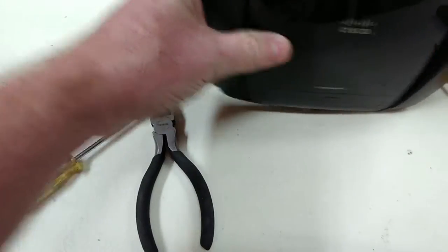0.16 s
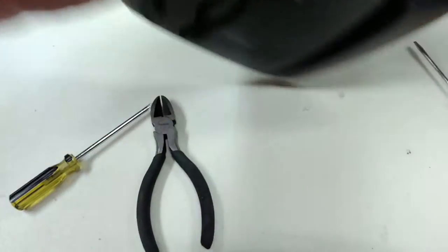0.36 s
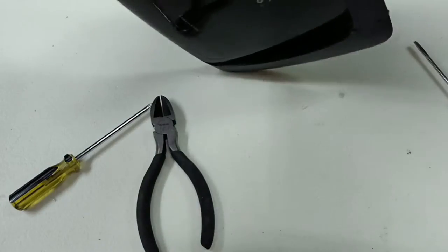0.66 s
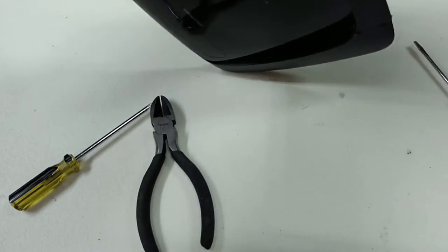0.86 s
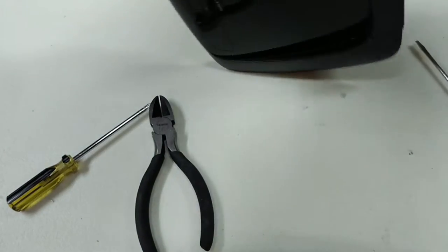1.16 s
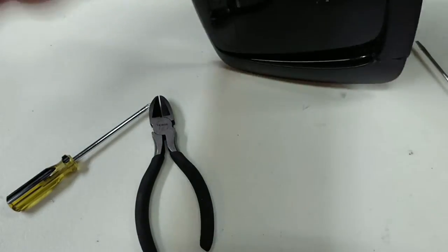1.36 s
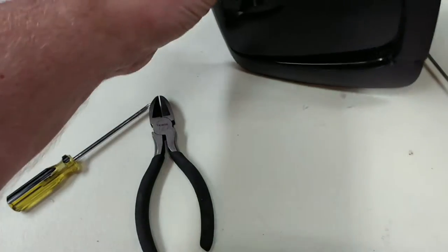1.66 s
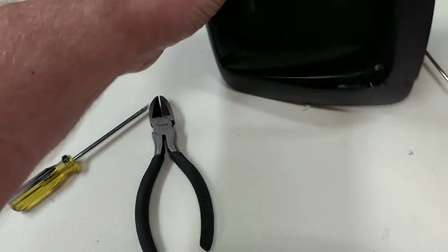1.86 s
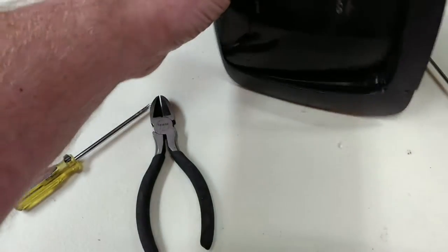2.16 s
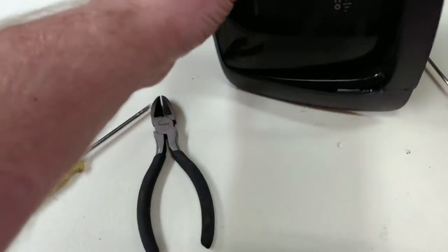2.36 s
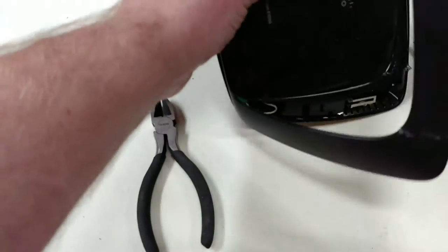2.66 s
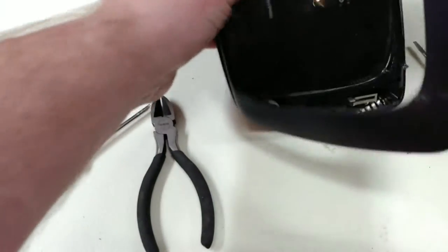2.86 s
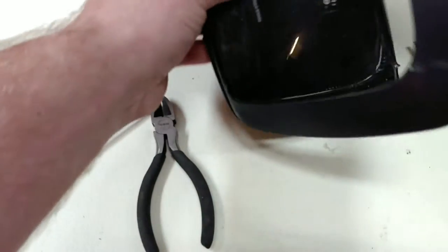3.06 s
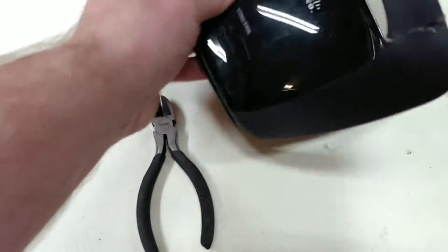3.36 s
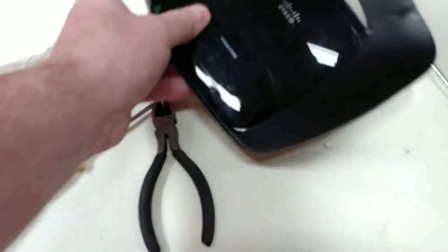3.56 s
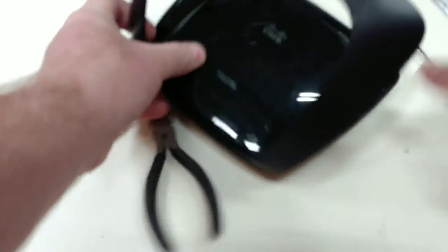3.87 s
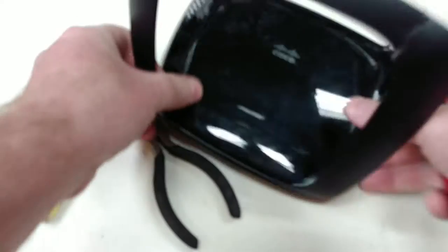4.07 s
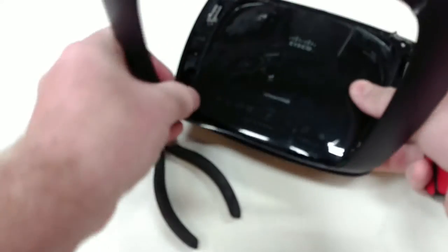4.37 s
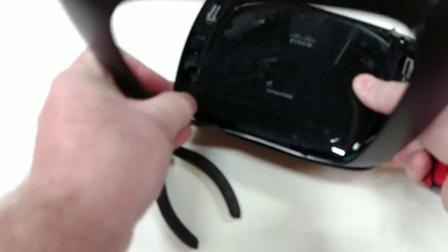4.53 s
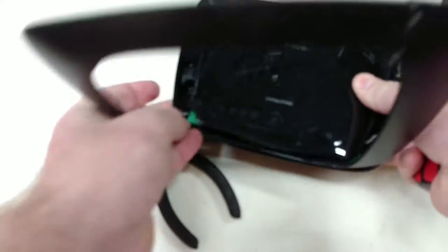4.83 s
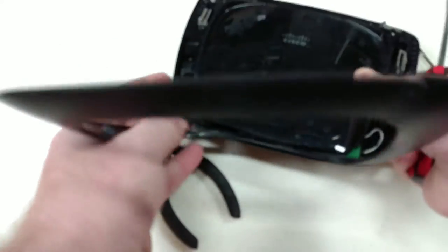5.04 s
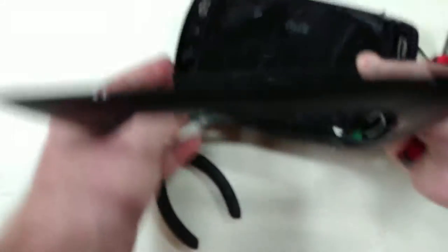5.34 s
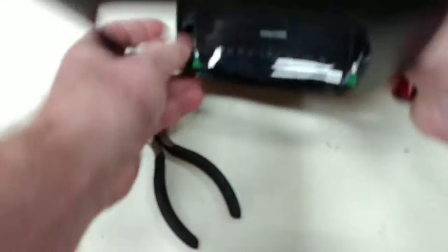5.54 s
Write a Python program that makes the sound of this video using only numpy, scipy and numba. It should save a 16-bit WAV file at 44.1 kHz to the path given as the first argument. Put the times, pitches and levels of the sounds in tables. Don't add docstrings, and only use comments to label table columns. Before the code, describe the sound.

Hands work a stiff plastic shell until its clips break with bright, dry, very short cracks that ring the hollow and echo briefly in a bare indoor room. Between them come tiny ticks, skin and plastic rubbing, dull bench thuds and, later, light fluttering taps. The microphones are very close, with breaks leaning left; the loudest snaps overload slightly and the level dips right after.

```python
import sys
import numpy as np
from scipy import signal
from scipy.fft import rfft, irfft
from scipy.io import wavfile
from scipy.ndimage import uniform_filter1d
from numba import njit

SR = 44100
rng = np.random.default_rng(int(sys.argv[2]) if len(sys.argv) > 2 else 0)


def field_ratio(decibels):
    return 10 ** (np.asarray(decibels, dtype=float) / 20)


def transcribe(u):
    v = np.clip(np.atleast_2d(u).T, -1, 1)
    q = np.round(v * 32767).astype(np.int16)
    wavfile.write(sys.argv[1], SR, q)


N = 251370
T = np.arange(N) / SR

# time in seconds, pitch in Hz.
HOLLOW_NOTE = [(0, 1221), (.75, 1333), (1.25, 1376), (1.66, 1180), (1.78, 1236), (2.8, 1255), (3.4, 1355),
               (3.62, 1173), (3.75, 1076), (4.3, 1148), (4.6, 1107), (4.8, 1170), (5.2, 1073), (5.7, 1032)]


def shape(x, points):
    hz, db = np.transpose(points)
    f = np.maximum(np.arange(x.shape[-1] // 2 + 1) * SR / x.shape[-1], 1)
    gain = field_ratio(np.interp(np.log(f), np.log(hz), db))
    return irfft(rfft(x) * gain, x.shape[-1])


def band(x, lo_hz, hi_hz):
    sos = signal.butter(2, [lo_hz, hi_hz], "band", fs=SR, output="sos")
    y = signal.sosfilt(sos, x)
    return y / np.sqrt(np.mean(y ** 2))


def ring(t, modes, chance, detune):
    total = 0
    for (hz, t60, db), c in zip(modes, chance):
        note = np.sin(2 * np.pi * hz * (1 + detune * c) * t)
        total = total + field_ratio(db + 1.6 * c) * note * 1000 ** (-t / t60)
    return total


def add(out, s, x, pan_db, lead):
    for ch in range(2):
        i = int(s * SR + lead * (ch - .5))
        n = min(x.shape[-1], N - i)
        out[ch, i:i + n] += x[ch, :n] * field_ratio(pan_db * (1.0 - ch))


def peak_one(x):
    return x / np.max(np.abs(x))


def unit(x):
    return x / np.linalg.norm(x)


def air():
    # pitch in Hz, level in dB.
    air_colour = [(18, -48), (30, -17), (98, -3), (692, -9.5), (854, -7.5), (1000, -25.5), (1140, -9),
                  (3840, -36), (11000, -13), (13600, -16.5), (15100, -11), (16400, -42.5)]
    level_db = -55 - 10.0
    noise = rng.standard_normal((3, N))
    tone = shape(noise[1:] + 0.22 * noise[0], air_colour)
    return field_ratio(level_db) * tone / np.sqrt(np.mean(tone ** 2))


def room(dry, wet_db, build_s):
    # pitch in Hz, level in dB, time to fade by 60 dB in seconds.
    echo_ranges = [(100, -10.5, 0.36), (285, 15, 0.39), (545, 3, 0.73), (1230, 1, 0.59), (2530, -4, 0.59),
                   (5300, 3, 0.5), (10000, 11, 0.34), (15200, -1, 0.2)]
    t = T[:SR]
    hz, db, t60 = np.transpose(echo_ranges)
    noise = rng.standard_normal((3, 2, len(t)))
    echo = 0
    for k in range(len(hz)):
        others_down = np.where(np.arange(len(hz)) == k, db[k], db[k] - 21.5)
        apart = min(hz[k] / 2700.0, 1)
        mixed = (1 - apart) * noise[0] + (apart + 0.29) * noise[1:]
        echo = echo + shape(mixed, list(zip(hz, others_down))) * 1000 ** (-t / t60[k])
    echo = echo * (1 - np.exp(-t / build_s))
    wet = signal.fftconvolve(dry[None], echo / np.sqrt(np.sum(echo ** 2)), axes=2)
    return field_ratio(wet_db) * wet.sum(1)[:, :N]


def wander():
    uneven_db, shifts_per_s = 0.5, 14
    steps = rng.standard_normal(256)
    return uneven_db * np.interp(T * shifts_per_s, np.arange(len(steps)), steps)


def hands():
    # time in seconds, pressure on the bench in dB,
    # sliding of the skin in dB, twist of the shell in dB.
    grip = [(0, -56, -48, -33), (0.13, -72.5, -58, -55.5), (0.55, -80, -71.5, -67), (0.76, -69, -56, -50),
            (1.24, -56.5, -59, -66), (1.5, -70, -59, -62.5), (1.75, -60, -51, -45),
            (1.849, -35.5, -28, -41), (1.97, -50, -39.5, -36), (2.251, -68.5, -77, -70.5),
            (2.449, -71, -52, -60.5), (2.6, -38.5, -53, -54.5), (2.85, -63.5, -70.5, -64.5),
            (3.201, -80, -66, -77.5), (3.8, -74.5, -64.5, -62), (4.549, -66.5, -59.5, -54),
            (5.2, -65, -63.5, -54), (5.7, -92, -71.5, -73)]
    s, *columns = np.transpose(grip)
    press_db, slide_db, twist_db = (np.interp(T, s, c) for c in columns)

    happens = rng.random(N) < 900 / SR
    sizes = field_ratio(0.83 * np.minimum(rng.exponential(size=N), 4))
    slips = happens * sizes * rng.standard_normal(N)
    grain = np.convolve(np.abs(slips), 1000 ** (-T[:600] / 0.0085))[:N]
    noise = rng.standard_normal((2, N))

    rumble = band(band(slips, 110, 560) + 0.21 * band(noise, 90, 390), 83, 570)
    rumble = rumble / uniform_filter1d(rumble ** 2, size=1200) ** 0.28

    catches = slips * (rng.random(N) < .45)
    creak = band(catches, 1190, 1290) + 0.5 * band(noise, 1180, 1300)
    creak = band(creak + 1.8 * band(noise[::-1], 780, 1700), 880, 1600)
    turn = 2 * np.pi * np.cumsum(np.interp(T, *np.transpose(HOLLOW_NOTE)) - 1240) / SR
    creak = np.real(signal.hilbert(creak) * np.exp(1j * turn))

    rub = band((grain + 0.61 * grain.mean()) * noise, 2300, 7100)
    groan = band(band(slips, 360, 880) + 1.8 * band(noise, 430, 810), 400, 920)

    rumble_db = press_db + wander()
    rub_db = slide_db + wander()
    creak_db = twist_db + wander()
    out = field_ratio((rumble_db + creak_db) / 2 - 12.0) * groan
    out = out + field_ratio(rumble_db + 3.5) * rumble
    out = out + field_ratio(creak_db - 11.0) * creak
    return out + field_ratio(rub_db - 5.0) * rub


def scrapes():
    # start in seconds, length in seconds, centre in Hz, width in Hz.
    drags = [(1.738, .034, 4700, 1100), (1.74, .03, 2800, 1500), (0.745, .062, 11000, 7000),
             (2.40, .11, 10000, 6000), (0.555, .06, 1400, 700), (4.666, .014, 12500, 6000),
             (1.0, .09, 9000, 5000), (0.8055, .007, 5500, 1200), (1.134, .008, 8000, 2500),
             (1.652, .01, 10500, 2000), (0.9, .006, 5000, 2500), (1.279, .016, 3500, 2500)]
    drag_db = [-40.5, -46.5, -61, -60.5, -62.5, -55, -58.5, -36, -36, -54.5, -49, -38]
    out, t = np.zeros((2, N)), T[:8192]
    for (s, length, hz, width), db in zip(drags, drag_db):
        catches = field_ratio(1.6 * np.repeat(rng.standard_normal(128), 64))
        grit = catches * rng.standard_normal((3, len(t)))
        swell = np.sin(np.pi * np.minimum(t / length, 1) ** 1.3) ** .7
        scrape = swell * band(grit[0] + .8 * grit[1:], hz - width / 2, hz + width / 2)
        add(out, s, field_ratio(db) * scrape, 4.0, lead=4)
    return out


def flutter():
    # start in seconds, peak in dB, pitch in Hz.
    taps = [(3.374, -51, 1390), (3.396, -42, 1390), (3.461, -55, 1390), (3.498, -58, 1330),
            (3.574, -61, 1180), (3.704, -58.5, 1120), (3.76, -44.5, 894), (3.777, -51, 850),
            (4.591, -44, 1167), (4.678, -45.5, 1170), (4.712, -53.5, 1210), (4.758, -48, 1220),
            (4.771, -52, 1140), (4.786, -47.5, 1200), (4.798, -56, 1130), (4.819, -52, 1165),
            (4.92, -47, 1110), (4.982, -55.5, 1410), (5.015, -49, 1190), (5.078, -48, 1330),
            (5.091, -47, 1180), (5.104, -48, 1230), (5.118, -51, 1190), (5.13, -52.5, 1210),
            (5.153, -53, 1310), (5.17, -52, 1210), (5.225, -42, 1090), (5.244, -46, 1060),
            (5.281, -49, 1200), (5.315, -57, 1200), (4.935, -53, 1300), (4.997, -61, 1110),
            (5.03, -61, 1250), (5.345, -51, 990), (3.54, -59.5, 1350), (3.756, -51.5, 1840)]
    t60 = .022
    out, t = np.zeros((2, N)), T[:2048]
    for s, db, hz in taps:
        modes = [(hz, t60, 0), (hz * 1.13, t60, -5), (hz * 0.8, t60, -6)]
        tap = ring(t, modes, .5 * rng.standard_normal(3), 0.011) * np.minimum(t / 0.0022, 1)
        add(out, s, field_ratio(db) * np.tile(peak_one(tap), (2, 1)), -1.5, lead=2)
    return out


def knocks(rows):
    # pitch in Hz, time to fade by 60 dB in seconds, level in dB.
    bench_notes = [(98.4, 0.21, -4), (192.7, 0.22, -4), (297.6, 0.39, -9.5), (614, 0.038, -21)]
    scuff_colour = [(150, -23.0), (300, 10), (500, 0.5), (800, -10.5), (1000, -14.5), (1300, -29.5)]
    scuff_share = 0.28
    out, t = np.zeros((2, N)), T[:16384]
    for s, db, hz, t60, bench_db in rows:
        chance = rng.standard_normal((2, 8))
        chance[1] = chance[0] + 0.5 * chance[1]
        scuff = shape(rng.standard_normal((2, len(t))), scuff_colour) * 1000 ** (-t / 0.14)
        case_notes = [(hz, t60, 3), (hz * 1.3, 1.1 * t60, -7)]
        thud = []
        for c in chance:
            case = ring(t, case_notes, 0.13 * c, 0.022)
            bench = ring(t, bench_notes, .6 * c[2:], 0.012)
            thud.append(case + field_ratio(bench_db) * bench)
        push = (thud + field_ratio(6.5 + scuff_share * bench_db) * scuff) * np.minimum(t / 0.003, 1)
        add(out, s, field_ratio(db) * peak_one(push), .8, lead=4 + 13 * chance[0, 7])
    return out


def breaks():
    # start in seconds, tear peak in dB, hollow in dB, hollow pitch in Hz,
    # left minus right in dB.
    snap_rows = [(0.0242, -37, -46, 924, 22), (0.9919, -19, -41.5, 1280, 12.5),
                 (1.0966, 8, -19.5, 1287, 7.5), (1.28, -25, -37, 1444, 7), (1.723, -24.5, -58.5, 1426, 8.5),
                 (1.7811, 7, -17, 1256, 8.5), (1.818, 6, -14, 1240, 9), (1.9737, -27.5, -25.5, 1272, 10),
                 (2.0933, -25, -57.5, 1300, 15.5), (2.312, -18, -32, 950, 11.5),
                 (2.5193, -5, -16.5, 1260, 7.5), (2.553, 13.5, -25, 1250, 7.5), (2.5638, 1, -18.5, 1160, 8),
                 (2.8219, -34.5, -41, 1390, 5.5), (3.053, -31, -37.5, 1330, 7),
                 (3.3473, -32.5, -44, 1456, 4), (3.416, -34, -32.5, 1400, 11.5),
                 (4.13, -29.5, -38.5, 1163, 15.5), (4.449, 6.5, -18, 1091, 11),
                 (4.4579, -28, -23, 1185, -6), (4.8798, -23, -36, 1100, 13),
                 (5.207, -44.5, -33.5, 1025, 20.5), (5.538, -22.5, -25, 950, 10.5),
                 (5.685, -22, -25.5, 1022, 16.5)]
    # walls in dB, top above 9 kHz in dB,
    # lower note in dB, upper note in dB.
    snap_colour = [(3.5, -2, -27, -22), (-3.5, 1, -14, 0.5), (-3.5, 11, -5.5, 0.5), (2, -3.5, -17, -21.5),
                   (-3.5, 4, 2.5, -2.5), (-7, 1, -11.5, -7), (-3, 5, -2.5, -4.5), (-0.5, 2, -19, -7.5),
                   (6.5, -12, -9.5, -6.5), (0.5, -12, 0, 3), (-3, 3, -2, -4.5), (-2, 0, -4, -11.5),
                   (-4, 1.5, -5.5, -7), (2.5, -5, -10.5, -30), (-1, -12.5, -18, -13),
                   (-1.5, -20, -12.5, -17), (0.5, -17.5, -14, -14), (-2, -0.5, -21.5, -9),
                   (-6, -5, -38, -9), (-4, 4.5, -35, -2.5), (-0.5, 4, -8.5, -8.5), (-4, 1.5, -15.5, -13),
                   (-5.5, 5, -9, -14), (-4, 1, -15.5, -19)]
    # start in seconds, tear peak, hollow and walls in dB.
    tick_rows = [(0.0182, -32, -51, -36), (0.189, -44.5, -91, -59), (0.297, -39, -70, -48.5),
                 (0.306, -42.5, -55, -52), (0.409, -53, -56, -59), (0.707, -72, -64, -60),
                 (0.739, -51, -55, -54), (0.8063, -29.5, -42.5, -36), (0.9006, -42, -71, -48.5),
                 (0.929, -49.5, -73, -50), (1.213, -34, -50, -35.5), (1.24, -34, -49, -39),
                 (1.4234, -46, -71.5, -55.5), (1.4655, -66, -55.5, -71), (1.5945, -28.5, -60, -62),
                 (1.632, -49, -47.5, -54), (1.655, -51.5, -46, -51), (1.672, -39, -54, -49.5),
                 (1.6837, -45, -54.5, -60.5), (1.698, -44, -69, -58), (3.0728, -37, -48.5, -49.5),
                 (3.88, -37, -64, -65), (4.2913, -47.5, -68, -60), (4.746, -45.5, -56, -73.5),
                 (4.9066, -34.5, -53.5, -55.5), (5.0616, -41.5, -40, -48.5), (5.1342, -47, -64, -60.5),
                 (5.2605, -45, -49.5, -63.5), (5.297, -28, -43, -46), (5.333, -45.5, -57, -61.5)]
    rattle_rows = [
        (0.0084, -39, -68, -44),
        (0.0502, -39, -43.5, -41.5),
        (0.614, -41, -57.5, -48.5),
        (4.0466, -49.5, -64, -59.5),
        (4.819, -59.5, -53.5, -63),
    ]
    # start in seconds, tear peak in dB, hollow in dB,
    # walls in dB, length factor.
    slip_rows = [(1.288, -32.5, -42, -35.5, 1.5), (1.74, -34.5, -46, -46.5, 2.4),
                 (1.751, -39.5, -41, -43, 2.6), (1.760, -29, -37.5, -40.5, 0.3),
                 (1.793, -12.5, -22, -24, 0.62), (1.806, -7, -38, -22, 0.78), (2.798, -42.5, -49, -50, 4.1),
                 (2.836, -41.5, -43.5, -54, 2.1), (3.624, -72, -63, -83, 3.3),
                 (3.329, -50, -58.5, -59, 4.2), (3.736, -45, -54, -61, 5.3), (3.754, -40, -49, -56, 2.6),
                 (4.861, -48, -49.5, -68, 0.95), (5.045, -46.5, -49, -66, 1.8), (5.169, -58, -64, -75, 1.5),
                 (5.188, -45, -65, -57, 2.8), (5.414, -48.5, -59.5, -61, 6.9),
                 (5.432, -45.5, -56, -66, 1.3), (5.453, -40, -55.5, -68, 1.7),
                 (5.648, -35.5, -63, -51, 2.2), (3.837, -46.5, -78.5, -76.5, 17),
                 (3.951, -46.5, -79.5, -81.5, 17), (4.158, -37, -46, -51.5, 2.3),
                 (4.187, -46, -50, -57.5, 1.7)]
    small_colour = (-2.5, -9.5, -5)  # top, lower note and upper note in dB
    tick_pan_db, slip_pan_db = 10, 9.5

    def note(s):
        return np.interp(s, *np.transpose(HOLLOW_NOTE))

    snaps = []
    for (s, tear, hollow, hz, pan), (wall_change, *colour) in zip(snap_rows, snap_colour):
        wall = hollow + 0.62 * (tear - hollow) - 5 + wall_change
        snaps.append((s, tear, hz, hollow, wall, pan, 1, colour))
    ticks = [(s, tear, note(s), hollow, wall, tick_pan_db, 1, small_colour)
             for s, tear, hollow, wall in tick_rows + rattle_rows]
    slips = [(s, tear, note(s), hollow, wall, slip_pan_db, length, small_colour)
             for s, tear, hollow, wall, length in slip_rows]
    return sorted(snaps + ticks) + slips


def cracks():
    # pitch in Hz, level in dB.
    tear_colour = [(900, -44), (1760, -28.5), (3000, -15.5), (6510, -2), (6990, -2.5), (8520, -1.5),
                   (10900, -4), (13300, -11), (15100, -8), (16400, -46)]
    # pitch in Hz, level in dB.
    wall_colour = [(350, -18), (600, 1.5), (900, 1.5), (1600, 0.5), (2200, 1.5), (2700, 3.5), (3200, 2),
                   (3800, 0), (4600, -0.5), (6500, -14.5)]
    # pitch in Hz, time to fade by 60 dB in seconds, level in dB.
    panels = [(2130, 0.025, -4), (2647, .02, -4), (3084, 0.03, 1), (3530, 0.023, -3)]
    early = .0025
    top_per_tear_db = -0.07
    bounce_s, bounce_db = 0.0025, -8.5
    out, spread, t = np.zeros((2, N)), np.zeros((2, N)), T[:4096]
    for s, tear_db, hollow_hz, hollow_db, wall_db, pan_db, length, (top_db, lower_db, upper_db) in breaks():
        noise, chance = rng.standard_normal((6, len(t))), rng.standard_normal(136)
        sizes = np.repeat(np.minimum(chance[8:], .9), 32)
        first = np.abs(t - early - .001) < .001
        jerks = field_ratio(8.7 * np.where(first, .7, sizes))
        tilt_db = top_per_tear_db * tear_db + top_db
        fracture = [(hz, db + tilt_db * np.clip(hz / 4000 - 2.2, 0, 1)) for hz, db in tear_colour]
        bass_db = 0.32 * (lower_db + 6.0)
        sides = [(hz, db + bass_db * np.clip(2.1 - hz / 700, 0, 1)) for hz, db in wall_colour]
        after = np.maximum(t - early, 0) / length
        rise = np.clip(after / 0.00025, field_ratio(-30) * t / early, 1)

        hiss = rise * jerks * 1000 ** (-after / 0.026) * (noise[0] + 0.5 * noise[1:3])
        hiss = shape(hiss, fracture)
        walls = rise * np.sqrt(jerks) * 1000 ** (-after / 0.047) * (noise[3] + 1.2 * noise[4:])
        walls = peak_one(shape(walls, sides))
        walls = walls + field_ratio(-6.5) * peak_one(ring(after * length, panels, 1.2 * chance[4:], 0.0068))
        modes = [(hollow_hz, .025, 0), (hollow_hz * 1.28, .025, upper_db),
                 (hollow_hz * 0.736, .03, lower_db), (hollow_hz * 1.1, .02, -9)]
        hollow = ring(after * length, modes, 0.98 * chance, 0.01) * (1 - np.exp(-after / 0.006))

        bounce = int(bounce_s * (1 + .08 * chance[7]) * SR)
        hiss, walls = (x + field_ratio(bounce_db) * np.roll(x, bounce, axis=1) for x in (hiss, walls))
        hiss = field_ratio(tear_db - 5.5) * peak_one(hiss)
        walls = field_ratio(wall_db + 13.5) * peak_one(walls)
        loss_db = min(lower_db + 24, 0)
        deep = [(350, 0), (hollow_hz * .55, loss_db), (hollow_hz * .72, loss_db), (hollow_hz * .88, 0)]
        hiss, walls, hollow = (shape(x, deep) for x in (hiss, walls, hollow))
        hollow = field_ratio(hollow_db + 8.5) * peak_one(hollow)
        add(out, s - early, hiss, pan_db + 1.5, lead=4)
        add(out, s - early, walls, pan_db / 3 - 4.5, lead=3.53)
        add(out, s - 1.282 * early, np.tile(hollow, (2, 1)), pan_db / 3 - 6.0, lead=0.45)

        impulse = 1. * (t == t[256])
        click = np.linalg.norm(hiss) * unit(shape(impulse, fracture))
        click = click + np.linalg.norm(walls) * unit(shape(impulse, sides))
        side = 2 * np.pi * rng.random()
        heard = click + 3.4 * hollow * 1000 ** (-after / 0.015)
        add(spread, s - early, np.outer([np.cos(side), np.sin(side)], heard), 0, lead=0)
    return out, spread


def scene():
    # start in seconds, peak in dB, pitch in Hz,
    # time to fade by 60 dB in seconds, bench share in dB.
    knock_rows = [(0.022, -34, 447.6, 0.14, -38), (0.049, -38.5, 298, 0.085, -24),
                  (0.6145, -21, 191.4, 0.073, -4), (0.649, -32, 230.6, 0.1, -19),
                  (0.669, -30.5, 235, 0.094, -2), (1.096, -16.5, 300.7, 0.016, -20.5),
                  (1.646, -38, 283.6, 0.27, 1.5), (1.738, -38, 307.7, 0.16, -18),
                  (1.779, -16.5, 292, 0.078, -8), (1.815, -16, 293.4, 0.044, -6.5),
                  (1.974, -37, 386.4, 0.11, -11.5), (2.308, -30.5, 280.6, 0.15, 0),
                  (2.555, -14, 447, 0.063, -12), (3.05, -38.5, 314.5, 0.152, -8),
                  (4.047, -44, 326, 0.078, -4.5), (4.1295, -17, 188, 0.047, -18),
                  (4.176, -42.5, 278, 0.033, -14), (4.45, -34, 303, 0.07, 14.5),
                  (4.816, -37.5, 274, 0.1, -12), (4.881, -32, 199.4, 0.1006, -4.5),
                  (5.206, -35.5, 498, 0.075, -6), (5.535, -24, 508, 0.021, -42.5),
                  (5.637, -46.5, 175, 0.17, -1), (5.685, -34, 502, 0.154, -45)]
    nudge_rows = [(0.003, -40, 420, 0.073, -37), (0.105, -50.5, 487, 0.087, -30),
                  (0.642, -44, 780, .06, -30), (0.668, -46.5, 702, 0.055, -32),
                  (1.155, -38.5, 296, 0.46, -34), (1.243, -39, 650, 0.044, -29),
                  (2.563, -30, 443, 0.037, -30), (2.6, -48, 211, .05, -19), (2.638, -32.5, 152, 0.057, -17),
                  (3.355, -48, 426, 0.14, -32.5), (3.422, -44, 611, 0.11, -27),
                  (3.625, -59.5, 810, 0.065, -33.5), (4.129, -24.5, 341, 0.032, -27.5),
                  (2.519, -34, 397, 0.046, -30.5), (4.6, -53, 301, 0.4, -29),
                  (5.545, -40.5, 666, 0.061, -34), (0.19, -55, 825, 0.1, -33),
                  (3.357, -48, 1120, 0.092, -27), (3.44, -47.5, 783, 0.067, -26),
                  (5.546, -37, 945, 0.15, -43)]
    # start in seconds, peak in dB, pitch in Hz.
    bump_rows = [
        (0.013, -60, 450),
        (0.27, -53.5, 183),
        (1.313, -49, 108.5),
        (3.348, -49.5, 176),
        (3.431, -52, 193),
        (5.062, -42.5, 290),
    ]
    bumps = [(*row, 0.17, 4.5) for row in bump_rows]
    direct, spread = cracks()
    thuds = knocks(knock_rows + bumps)
    echo = room(1.16 * spread + 1.2 * thuds, -11.5, 0.013)
    handling = hands() + knocks(nudge_rows) + flutter() + scrapes()
    return direct + thuds + echo + handling + air()


@njit
def follow(x, attack, release):
    e, out = 0., np.empty(len(x))
    for i in range(len(x)):
        e += (x[i] - e) * (attack if x[i] > e else release)
        out[i] = e
    return out


def roll_off(x):
    return signal.sosfilt(signal.butter(12, 15900, fs=SR, output="sos"), x)


def record(dry):
    attack_s, release_s, threshold_db = 0.0025, 0.023, -16.5
    loud = follow(np.abs(dry).max(0), 1 / (attack_s * SR), 1 / (release_s * SR))
    gain = np.minimum(field_ratio(threshold_db) / (loud + 1e-9), 1) ** 0.7
    hot = dry * uniform_filter1d(gain, size=48)
    tips = hot - np.clip(hot, -.9, .9)
    hot = hot - shape(tips, [(1500, -30), (4000, 0)])
    return roll_off(np.clip(hot, -1, 1))


dry = scene()
out = record(dry)
transcribe(out)
```